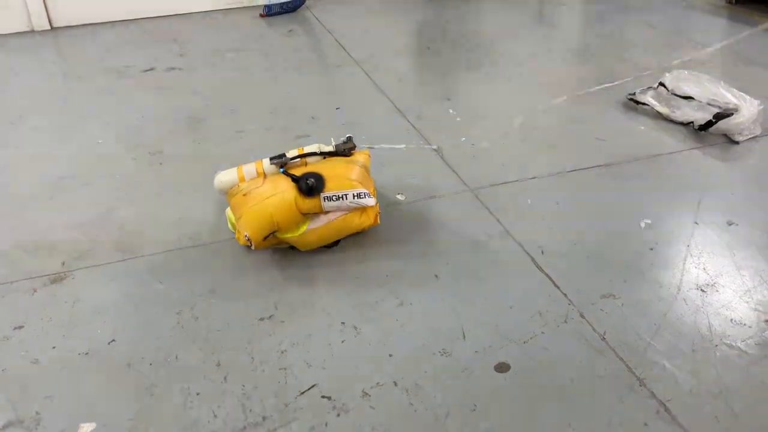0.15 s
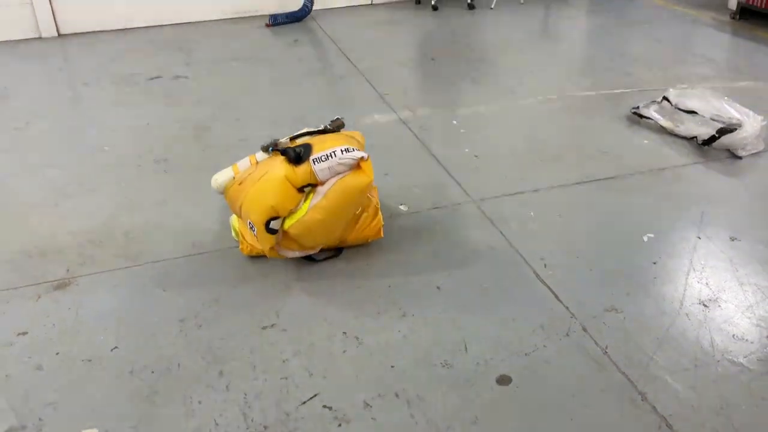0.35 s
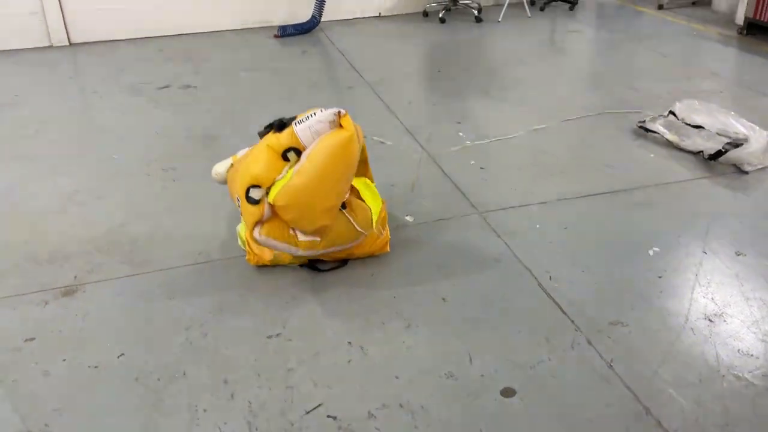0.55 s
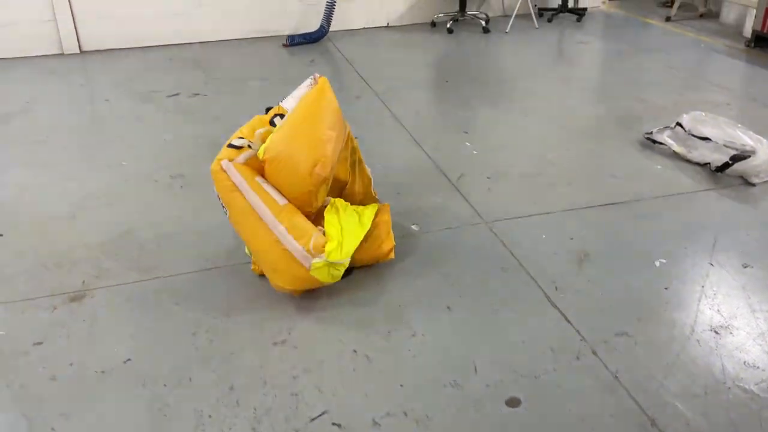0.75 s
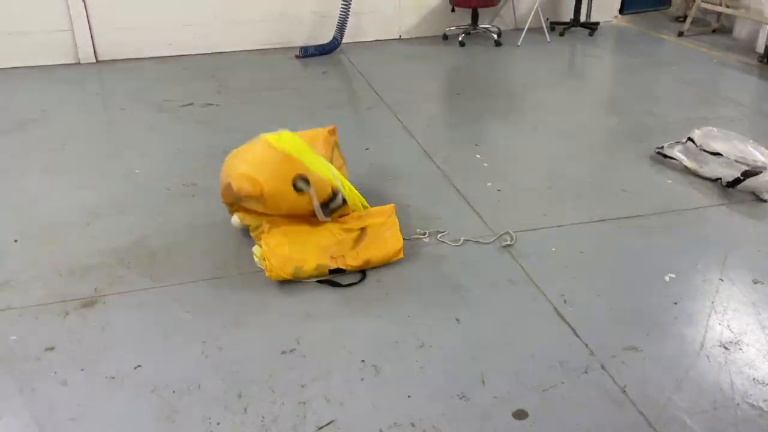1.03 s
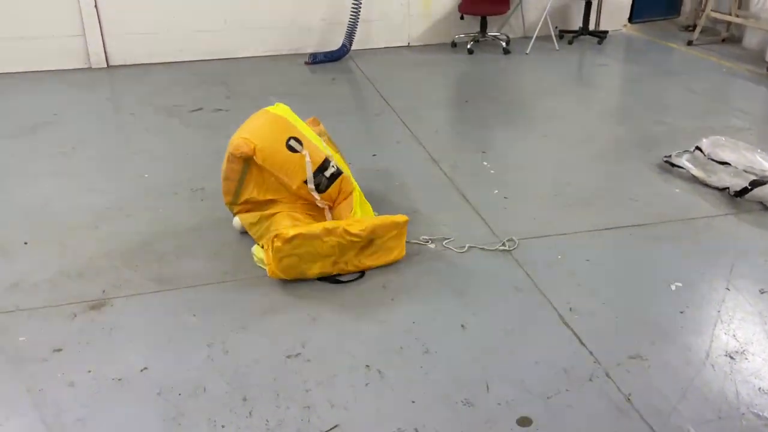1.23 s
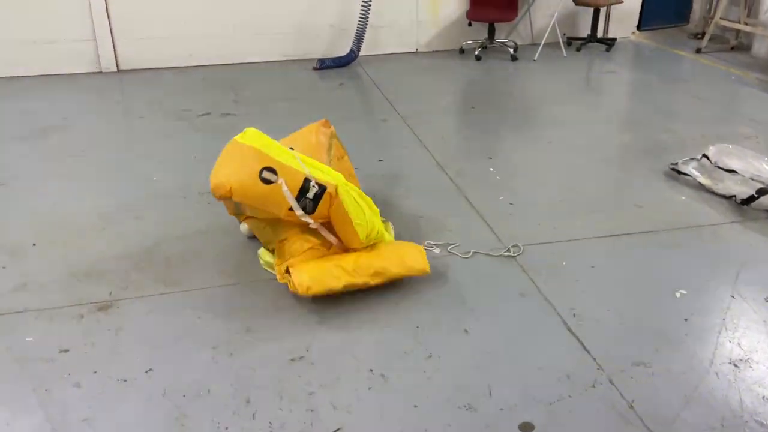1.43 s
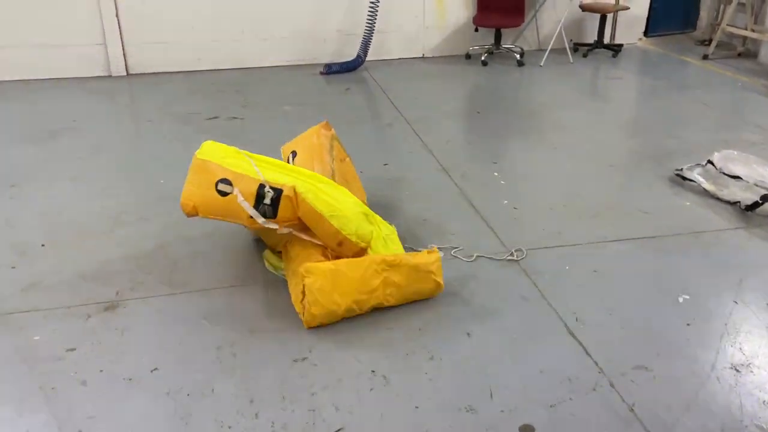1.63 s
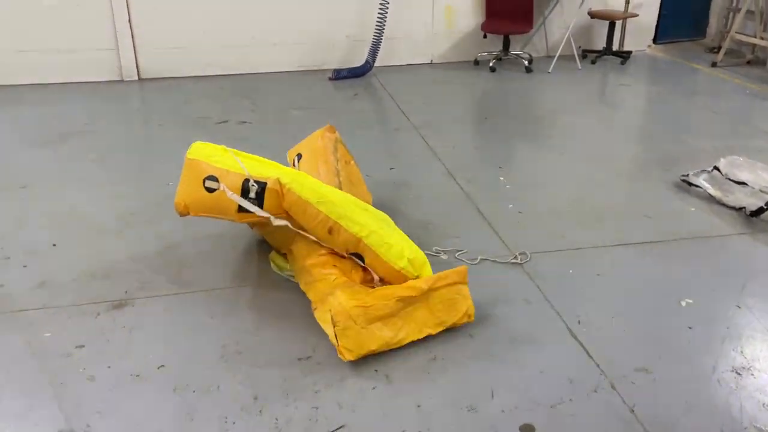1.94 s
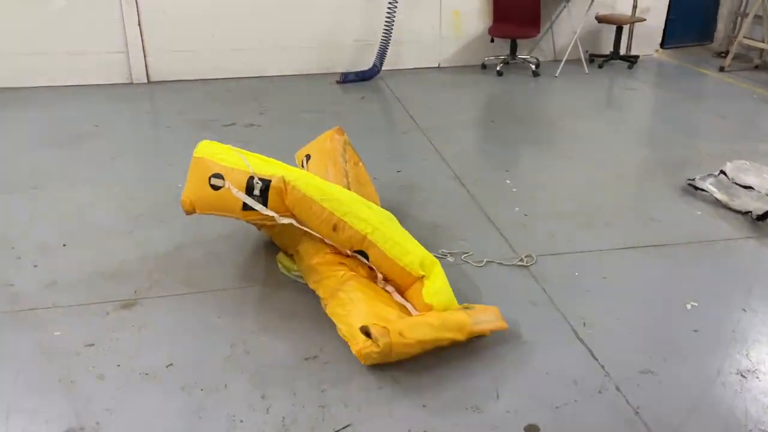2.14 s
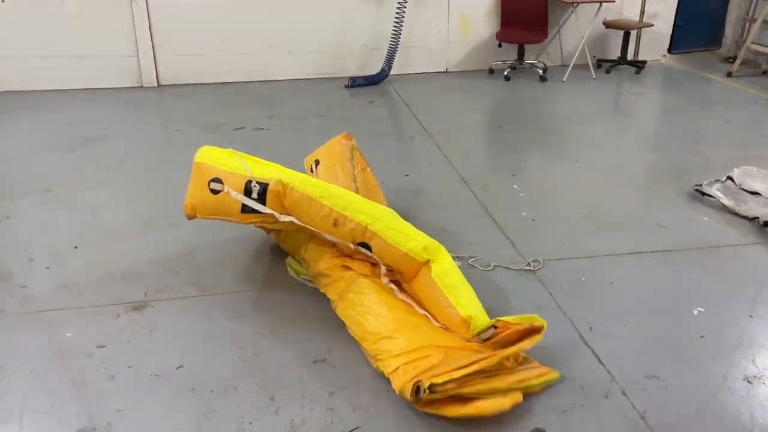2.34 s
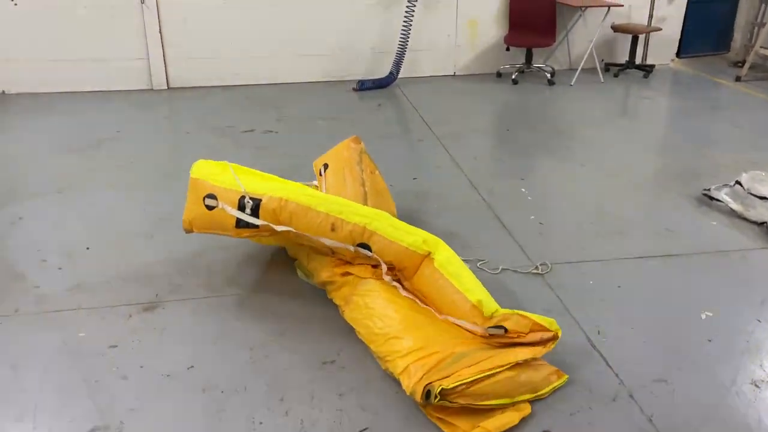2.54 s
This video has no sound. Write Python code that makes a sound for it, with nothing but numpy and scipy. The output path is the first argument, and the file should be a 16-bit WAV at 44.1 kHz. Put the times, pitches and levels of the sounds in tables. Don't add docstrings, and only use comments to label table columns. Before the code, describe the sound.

A loud, broad gas hiss and roar cuts in at full force, bursts past opening folds, is joined by a quick hollow fabric flop, then grows duller over a faint machine drone in an echoing workshop.

```python
import sys
import numpy as np
from scipy import signal
from scipy.fft import rfft, irfft, next_fast_len
from scipy.io import wavfile
from scipy.ndimage import uniform_filter1d, map_coordinates

SR = 44100
rng = np.random.default_rng(int(sys.argv[2]) if len(sys.argv) > 2 else 0)


def gain_from_db(level_db):
    decades = np.asarray(level_db, float) / 20
    return 10 ** decades


def unload_audio(sound):
    columns = np.transpose(np.atleast_2d(sound))
    steps = np.round(np.clip(columns, -1, 1) * 32767)
    wavfile.write(sys.argv[1], SR, steps.astype(np.int16))


N = 118188


def unit(x):
    return x / np.sqrt(np.mean(x ** 2) + 1e-20)


def along(points, hz):
    point_hz, value = np.transpose(points)
    return np.interp(np.log(hz + 1), np.log(point_hz + 1), value)


def curve(rows):
    return np.interp(np.arange(N) / SR, *np.transpose(rows))


def wobble(rate):
    knots = rng.standard_normal(N // 100)
    return map_coordinates(knots, [np.arange(N) * rate / SR])


def filtered(x, response):
    size = next_fast_len(N + SR // 2)
    spectrum = rfft(x, size) * response(np.fft.rfftfreq(size, 1 / SR))
    return irfft(spectrum, size)[..., :N]


def rush(common, apart, side_db, patchy_db, direct=0.):
    grains = signal.stft(rng.standard_normal((2, N)), nperseg=512)[2]
    field = rng.standard_normal(grains.shape[1:])
    field = uniform_filter1d(field, size=8, axis=0)
    field = uniform_filter1d(field, size=10, axis=1)
    pair = signal.istft(grains * gain_from_db(patchy_db * unit(field)), nperseg=512)[1][:, :N]
    share = np.clip(direct, 0, 1)
    shifted = filtered(pair[0], lambda hz: 1j + 0 * hz)
    other = np.sqrt(1 - share ** 2) * pair[1] + share * shifted
    mid = unit(filtered(pair[0], lambda hz: gain_from_db(along(common, hz))))
    side = gain_from_db(side_db) * unit(filtered(other, lambda hz: gain_from_db(along(apart, hz))))
    return np.array([mid + side, mid - side])


# shaft_multiple, level_db
DRONE_TONES = [(2, 3.5), (3, -2.5), (4, -19.5), (5, -7.5), (6, -15.5), (8, -3.5), (9, -25), (10, -8.5),
               (15, -12), (16, -4.5)]
# time_s, gain_db
RECORDER_GAIN = [(0.09, -33), (0.13, -35.5), (0.9, -42.5), (1.48, -39), (1.77, -40.5), (2.09, -41),
                 (2.61, -44), (2.68, -48)]


def drone():
    shaft_hz, unsteady_db = 23.16, 1.5
    clock = np.arange(N) / SR
    hum = np.zeros(N)
    for multiple, level_db in DRONE_TONES:
        level = gain_from_db(level_db + unsteady_db * wobble(4.36))
        turns = multiple * shaft_hz * clock + rng.random()
        hum += level * np.sin(2 * np.pi * turns)
    return np.sqrt(2) * gain_from_db(curve(RECORDER_GAIN)) * hum * gain_from_db([[.6], [-.6]])


# pitch_hz, level_db
BOOM_SPECTRUM = [(30, -40), (50, -6), (72, 7), (100, -10), (200, -40), (400, -120)]


def boom():
    hold_s, t60_s, level_db = .22, .6, -36
    ring_hz, ring_db = 70.7, -7
    clock = np.arange(N) / SR
    since_hold = np.clip(clock - hold_s, 0, None)
    ring = gain_from_db(ring_db) * np.sin(2 * np.pi * ring_hz * clock)
    thud = rush(BOOM_SPECTRUM, BOOM_SPECTRUM, side_db=-17, patchy_db=3.0)
    return gain_from_db(level_db - 60 * since_hold / t60_s) * (ring + thud)


# time_s, level_db
TUBE_LEVEL = [
    (.9, -57),
    (1.2, -38),
    (1.6, -37.5),
    (1.9, -39),
    (2.68, -43),
]


def tube():
    pitch_hz, width_hz = 410.7, 16
    breath = rng.standard_normal(N)
    hum = filtered(breath, lambda hz: 1 / (1 + 2j * (hz - pitch_hz) / width_hz) ** 2)
    return gain_from_db(curve(TUBE_LEVEL)) * unit(hum)


# start_s, level_db, pitch_hz, t60_s (time to fade by 60 dB)
FLOOR_SLAPS = [
    (1.006, -20.5, 535, 0.11),
    (1.014, -26.5, 290, 0.48),
    (1.026, -14, 840, 0.077),
    (1.037, -16.5, 605, 0.1),
    (1.061, -20.5, 1010, .12),
    (1.065, -29, 111, .2),
    (1.087, -22, 440, 0.13),
    (1.096, -24, 159, 0.36),
    (1.199, -27.5, 323, 0.21),
]


def flops():
    push_s, push_width_s, push_db = 1.0097, .0004, -8
    puff_width, rise_s = 0.27, 0.0028
    tail_db, tail_t60_s = -7, .8
    clock = np.arange(N) / SR
    u = (clock - push_s) / push_width_s
    slaps = gain_from_db(push_db) * (1 - u ** 2) * np.exp(-u ** 2 / 2)
    for start_s, level_db, pitch_hz, t60_s in FLOOR_SLAPS:
        since = np.clip(clock - start_s, 0, None)
        noise = rng.standard_normal(N)
        puff = unit(filtered(noise, lambda hz: np.exp(-(np.log((hz + 1) / pitch_hz) / puff_width) ** 2)))
        slaps += gain_from_db(level_db - 60 * since / t60_s) * (1 - np.exp(-since / rise_s)) * puff
    tail_clock = np.arange(SR) / SR
    tail = rng.standard_normal((2, SR)) * gain_from_db(-60 * tail_clock / tail_t60_s)
    tail = tail + 0.74 * tail[::-1]
    tail = tail / np.linalg.norm(tail[0])
    echo = signal.fftconvolve(slaps[None], tail, axes=1)[:, :N]
    return slaps * gain_from_db([[.6], [-.6]]) + gain_from_db(tail_db) * echo


# pitch_hz, level_db (per Hz)
ROAR_COMMON = [(36, -40), (56, -4), (100, -11.5), (160, -3), (300, -5.5), (620, -0.5), (1100, -2),
               (2000, -7), (2600, -10), (4400, -120)]
# pitch_hz, level_db (per Hz)
ROAR_APART = [(47, -65), (80, -33), (108, -21.5), (299, -12.5), (628, -3.5), (690, -3.5), (2000, -4),
              (2600, -34), (4400, -120)]


def roar(swing_db):
    level_db = 10.5 + .2 * swing_db + 0.14 * wobble(4.67)
    return gain_from_db(level_db) * rush(ROAR_COMMON, ROAR_APART, side_db=-2.5, patchy_db=0.73)


# time_s, level_db
FOLD_SURGES = [(.09, -22.5), (.17, -26), (.22, -18.5), (.245, -30), (.4, -30.5), (.45, -23), (.49, -28.5),
               (.59, -26.5), (.66, -33), (.8, -28.5), (.9, -34), (1.1, -29), (1.4, -38), (2.68, -48)]
# pitch_hz, level_db (per Hz)
WHOOSH_SPECTRUM = [(500, -55), (900, 1), (1700, 3), (2300, 0.5), (3100, 1), (3600, -48), (5000, -35),
                   (9000, -120)]


def whoosh(mean_force_db):
    level_db = curve(FOLD_SURGES) - mean_force_db
    return gain_from_db(level_db) * rush(WHOOSH_SPECTRUM, WHOOSH_SPECTRUM, side_db=-8.5, patchy_db=2.0, direct=.45)


# pitch_hz, level_db (per Hz)
HISS_COMMON = [(1000, -12), (1700, -8.5), (2660, -2), (3450, -4.5), (4890, -5.5), (5660, -12.5), (6560, -8),
               (7600, -19.5), (8250, -22), (8400, -50), (12000, -120)]
# pitch_hz, level_db (per Hz)
HISS_APART = [(1000, -27), (1700, -21), (2390, -3.5), (2980, -1), (3590, -2.5), (4420, -9), (5890, -7),
              (6560, -17), (8400, -23), (10900, -42), (18500, -120)]


def hiss(swing_db):
    level_db = 7 + .85 * swing_db
    return gain_from_db(level_db) * rush(HISS_COMMON, HISS_APART, side_db=-.8, patchy_db=1.1, direct=.45)


# pitch_hz, level_db (per Hz)
FIZZ_COMMON = [(8000, -40), (8900, -4.5), (9500, -1.5), (10100, -1), (14000, -5), (15050, -11),
               (15300, -23), (16400, -20), (16600, -120)]
# pitch_hz, level_db (per Hz)
FIZZ_APART = [(4700, -32), (8000, -1.5), (10200, -12), (11500, -19), (12300, -21), (15600, -48),
              (22000, -120)]


def fizz(swing_db):
    level_db = -13.5 + 1.3 * swing_db + 0.4 * wobble(2.65)
    return gain_from_db(level_db) * rush(FIZZ_COMMON, FIZZ_APART, side_db=9.5, patchy_db=1.3)


# time_s, level_db
JET_FORCE = [(.09, -29), (.13, -27), (.22, -27), (.25, -29), (.55, -30), (.7, -32.5), (1.1, -34.5),
             (1.3, -35), (1.75, -37), (2.05, -36.5), (2.68, -37)]
# time_s, level_db
JET_LEAN = [(.1, -1.7), (1.1, -0.4), (2.68, -0.6)]


def jet():
    force_db = curve(JET_FORCE)
    mean_db = force_db.mean()
    swing_db = force_db - mean_db + 0.13 * wobble(14)
    gas = roar(swing_db) + whoosh(mean_db) + hiss(swing_db) + fizz(swing_db)
    lean_db = curve(JET_LEAN) / 2
    return gain_from_db(mean_db) * gas * gain_from_db([lean_db, -lean_db])


def scene():
    return drone() + boom() + tube() + flops() + jet()


def roll_off(x):
    return signal.sosfilt(signal.butter(12, 16310, fs=SR, output="sos"), x)


# pitch_hz, level_db
PORT_BALANCE = [(60, 0.5), (130, 1), (290, 0), (640, 2), (1410, 1.5), (3100, -0.5), (6820, 0), (15000, 1)]


def record(dry):
    low_cut_hz, cut_in_s, cut_rise_s = 38, 0.084, 0.00026

    def port_response(hz):
        balance_db = along(PORT_BALANCE, hz) * np.array([[.5], [-.5]])
        return gain_from_db(balance_db) / np.sqrt(1 + (low_cut_hz / (hz + 1)) ** 4)

    gate = np.clip((np.arange(N) / SR - cut_in_s) / cut_rise_s, 0, 1)
    return roll_off(filtered(dry, port_response) * gate)


dry = scene()
out = record(dry)
unload_audio(out)
```